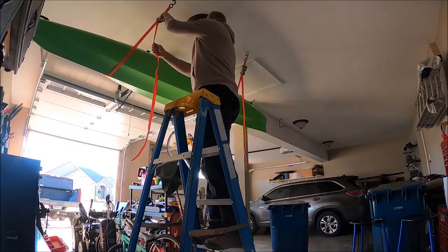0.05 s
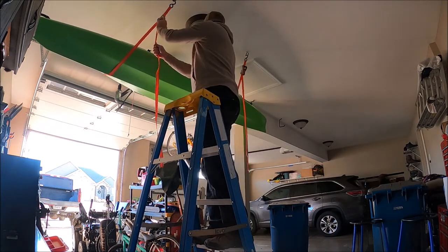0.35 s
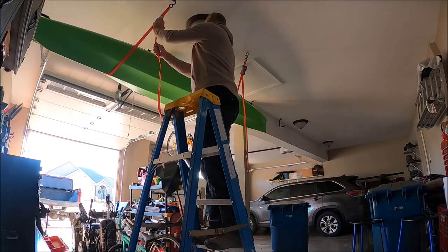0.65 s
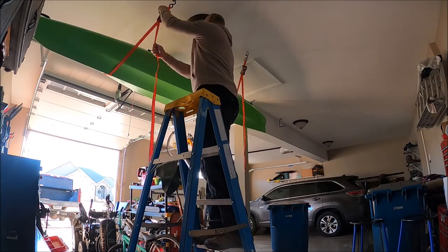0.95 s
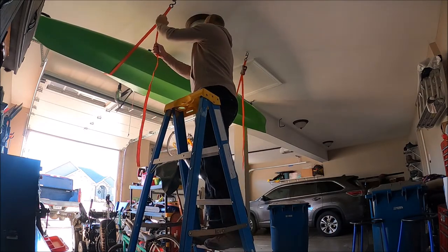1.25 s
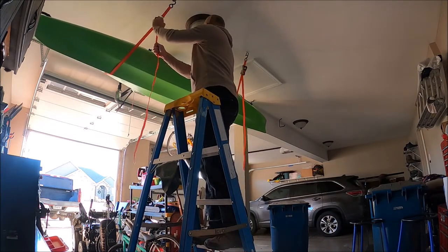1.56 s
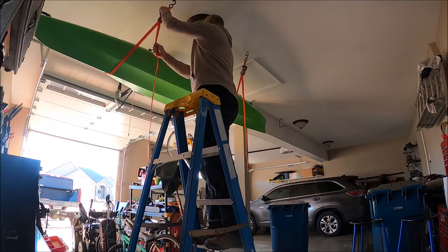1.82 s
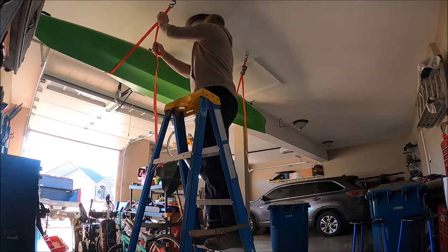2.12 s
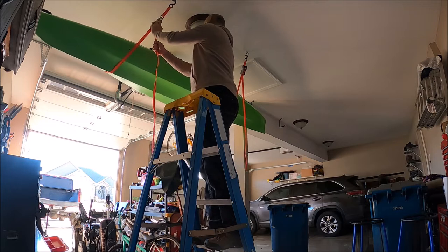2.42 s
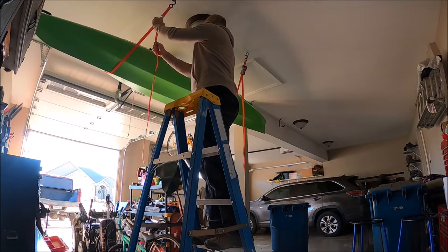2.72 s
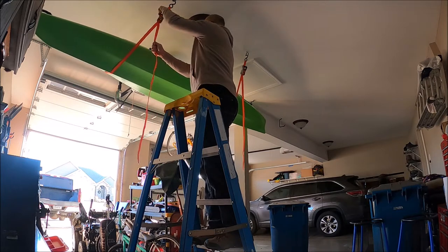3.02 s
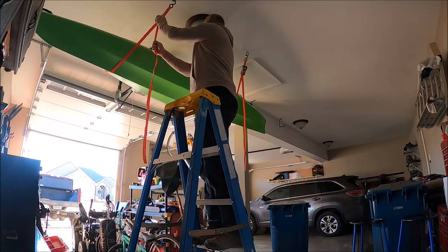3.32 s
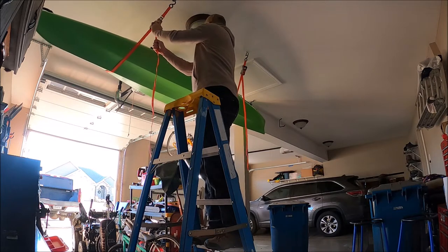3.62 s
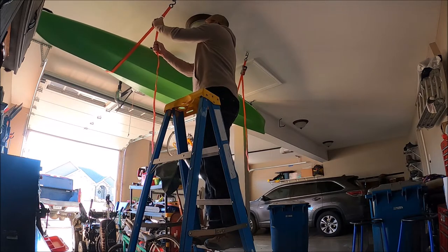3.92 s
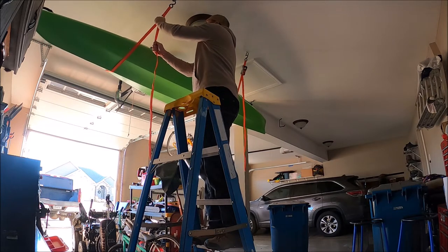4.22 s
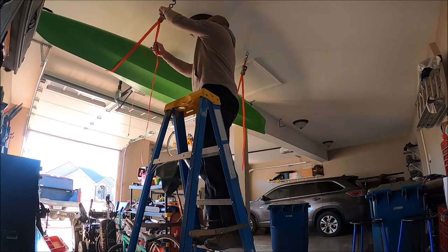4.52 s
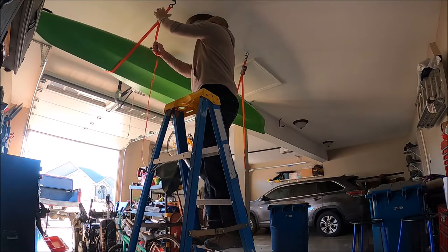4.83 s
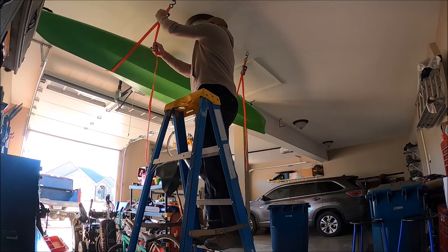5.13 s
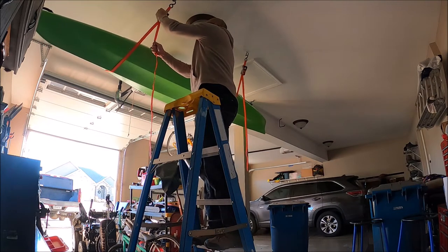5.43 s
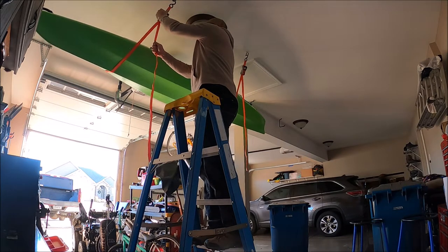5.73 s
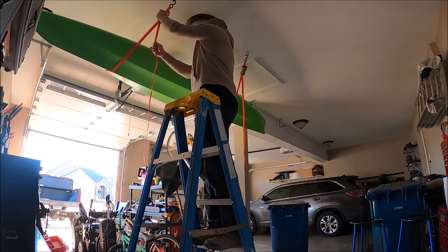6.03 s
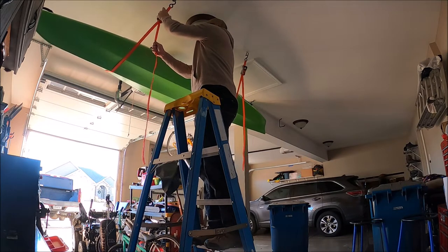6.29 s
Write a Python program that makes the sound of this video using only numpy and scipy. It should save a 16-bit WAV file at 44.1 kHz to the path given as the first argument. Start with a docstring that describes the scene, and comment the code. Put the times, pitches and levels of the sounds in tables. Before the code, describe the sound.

Inside a garage, a metal buckle and hook snap and ring as a strap hoists a kayak. The clicks come in irregular runs, often doubled, and thin out in the second half. Each one jolts the hollow plastic hull into a dull thump, with soft strap rubbing and a low swaying rumble. A stereo microphone pair picks up the short room echo and faint air through the open door.

```python
"""Faint outdoor air through an open garage door and a low rumble come first, then sharp clicks, often paired:
someone on a stepladder hoists a kayak under the ceiling, tugging a strap through its metal buckle.
Buckle and hook crack and ring at each contact; the strap rubs on the hollow hull, which thumps and sways.
Heard from inside on a stereo microphone pair, with the bare garage ringing on and a faint whine far off."""
import sys
import numpy as np
from scipy import signal
from scipy.fft import rfft, irfft, next_fast_len
from scipy.io import wavfile

SR = 44100
rng = np.random.default_rng(int(sys.argv[2]) if len(sys.argv) > 2 else 0)


def log_audio(samples):
    """Write samples as a 16-bit WAV file to the path given in sys.argv[1]."""
    # one column per channel
    frames = np.atleast_2d(samples).T
    # limit to full scale, then quantise
    limited = np.clip(frames, -1, 1)
    pcm = np.round(limited * 32767).astype(np.int16)
    wavfile.write(sys.argv[1], SR, pcm)


N = 284797
TIME = np.arange(N) / SR


def from_db(db):
    """Decibels to gain."""
    return 10 ** (np.asarray(db) / 20)


def at_hz(points, hz):
    """Read a curve on a log-frequency axis."""
    point_hz, values = np.array(points).T
    return np.interp(np.log(hz + 1e-9), np.log(point_hz), values)


def band(x, low, high):
    """Causal band-pass, edges in Hz."""
    return signal.sosfilt(signal.butter(2, [low, high], "band", fs=SR, output="sos"), x)


def colour(x, spectrum):
    """Minimum-phase filter: nothing sounds before its cause."""
    size = 2 * next_fast_len(x.shape[-1])
    gain = from_db(at_hz(spectrum, np.fft.rfftfreq(size, 1 / SR)))
    cepstrum = irfft(np.log(gain))
    cepstrum[1:size // 2] *= 2
    cepstrum[size // 2 + 1:] = 0
    return irfft(rfft(x, size) * np.exp(rfft(cepstrum)))[..., :x.shape[-1]]


def add(track, s, sound):
    """Mix a sound into the track at a time."""
    at = max(round(s * SR), 0)
    track[:, at:at + sound.shape[-1]] += sound[..., :N - at]


def swell(s, rise_db_per_s, fall_db_per_s, hold_s=0):
    """Gain that rises to 1 around a time, holds and dies away."""
    early = np.maximum(s - hold_s / 2 - TIME, 0)
    late = np.maximum(TIME - s - hold_s / 2, 0)
    return from_db(-np.minimum(rise_db_per_s * early + fall_db_per_s * late, 200))


def ring(modes, t, scatter_db, detune):
    """Decaying sines; a blow can scatter the strength and pitch of each mode."""
    hz, db, t60 = np.array(modes, float).T[:, :, None]
    strength, shift, phase = rng.standard_normal((3, len(modes), 1))
    wave = np.sin(2 * np.pi * (hz * (1 + detune * shift) * t + phase))
    return np.sum(from_db(db + scatter_db * strength - 60 * t / t60) * wave, axis=0)


# diffuse sound at the microphone pair: (frequency [Hz], left-right correlation [0-1])
PAIR_CORRELATION = [(120, .94), (300, .87), (600, .78), (1500, .62), (4000, .35), (10000, .17)]

def diffuse(size):
    """White noise from all around, alike at both microphones in the bass and less so in the treble."""
    padded = 2 * next_fast_len(size // 2 + 1)
    mid, side = rfft(rng.standard_normal((2, padded)))
    alike = at_hz(PAIR_CORRELATION, np.fft.rfftfreq(padded, 1 / SR))
    return irfft(np.sqrt((1 + alike) / 2) * mid + np.sqrt((1 - alike) / 2) * side * [[1], [-1]])[:, :size]


def noise(spectrum):
    """Coloured diffuse noise, rms 1."""
    x = colour(diffuse(N), spectrum)
    return x / x.std()


# outdoor air, heard from inside the garage: (frequency [Hz], relative density [dB])
AIR_SPECTRUM = [(30, -1), (80, -10), (180, -18), (300, -23), (700, -33), (1000, -31), (1250, -27.5),
                (1600, -34.5), (4000, -47.5), (8000, -45), (15000, -72.5)]
# swells of a distant whine: (time [s], level [dB], pitch [Hz])
FAR_WHINES = [(0.05, -74, 1280), (0.85, -63.5, 1320), (4.381, -72.5, 1170)]

def outdoors(air_db=-62, whine_width_hz=130):
    """A steady wash of air through the open door, with a far whine that comes and goes."""
    out = from_db(air_db) * noise(AIR_SPECTRUM)
    for s, db, hz in FAR_WHINES:
        whine = band(diffuse(N), hz - whine_width_hz / 2, hz + whine_width_hz / 2)
        out += from_db(db) * swell(s, rise_db_per_s=42, fall_db_per_s=42) * whine / whine.std()
    return out


# decay of the bare garage: (frequency [Hz], t60 [s])
ROOM_DECAY = [(150, 0.27), (800, 0.52), (2000, 0.64), (5000, 0.56), (8500, 0.38), (14000, 0.23)]
# its reverberation at the microphones: (frequency [Hz], relative level [dB])
ROOM_LEVEL = [(200, -1.5), (1000, 8), (3000, 2), (6000, 0.5), (12000, -5)]

def garage(cracks, rings, build_s=0.00088, wash_db=-2.0, echo_db=1.5):
    """Dense reflections off floor, walls and clutter: tones keep their pitch, cracks scatter into a wash."""
    t, response, wash = TIME[:SR], 0, 0
    edges_hz = np.geomspace(100, 17000, 19)
    white = diffuse(N), diffuse(N)   # neighbouring bands get independent noise
    fill = np.exp(-1 / (build_s * SR))
    for k, (low, high) in enumerate(zip(edges_hz, edges_hz[1:])):
        hz = np.sqrt(low * high)
        t60, gain = at_hz(ROOM_DECAY, hz), from_db(at_hz(ROOM_LEVEL, hz))
        field = band(white[k % 2], low, high)
        decay = from_db(-60 * t / t60) * (1 - np.exp(-t / build_s))
        response += gain * field[:, :SR] * decay / np.linalg.norm(decay)
        # the energy of a crack fills the room, then leaks away
        power = band(cracks[0] + 1e-18 * field[0], low, high) ** 2   # tiny floor against underflow
        filled = signal.lfilter([1 - fill], [1, -fill], power)
        retained = from_db(-60 / (t60 * SR)) ** 2
        lingering = signal.lfilter([1 - retained], [1, -retained], filled)
        wash += gain * np.sqrt(lingering) * field / field.std()
    echo = signal.fftconvolve(rings, response, axes=1)[:, :N]
    return from_db(wash_db) * wash + from_db(echo_db) * echo


# the strap rubbing on the shell overhead: (frequency [Hz], relative density [dB])
RUB_SPECTRUM = [(60, -36.5), (160, -12), (188, 3.5), (240, -15.5), (320, -15.5), (410, -19), (600, -34.5),
                (1300, -39), (4000, -31), (15000, -63)]

def strap_rub(sway_power, with_sway_db=-16, with_jolt_db=-4.0, lead_db=-10, knock_share=0.94, lag_s=.025):
    """The strap rubs as the boat sways, as it tightens before each jolt and as it settles after."""
    power = from_db(with_sway_db) ** 2 * sway_power
    for s, boom_db, knock_db in jolts():
        jolt_db = boom_db + knock_share * (knock_db - boom_db)
        strength = from_db(with_jolt_db + jolt_db) * np.where(TIME < s, from_db(lead_db), 1)
        power += (strength * swell(s + lag_s, rise_db_per_s=97.5, fall_db_per_s=104)) ** 2
    return np.sqrt(power) * noise(RUB_SPECTRUM)


# rumble of the boat swaying under the ceiling: (frequency [Hz], relative density [dB])
SWAY_SPECTRUM = [(15, -8), (28, 3.5), (38, -7.5), (49, 1), (62, -8), (85, -16), (115, -17), (160, -28),
                 (300, -36.5), (2000, -93.5)]
# heaves from the stepladder: (peak time [s], hold [s], sway level [dB], thud level [dB])
STRAP_HEAVES = [(0.56, 0.012, -34.5, -43.5), (1.109, 0.16, -37, -43), (1.39, 0.089, -40, -53.5),
                (1.946, 0.11, -37, -40), (2.29, 0.056, -35, -56.5), (2.52, 0.085, -41, -44),
                (3.044, 0.047, -46.5, -48), (3.234, .04, -39, -47.5), (3.585, 0.053, -37.5, -52),
                (4.74, 0.15, -33, -40), (5.33, 0.11, -42, -54.5), (5.584, 0.098, -43, -41)]

def hanging_boat(rest_db=-58, sway_gain_db=0.5, thud_gain_db=-3.0, thud_band_hz=(75, 150)):
    """The boat thuds dully with each heave and rumbles on as it sways against the strap."""
    sway_power, thud_power = from_db(rest_db) ** 2, 0
    for s, hold_s, sway_db, thud_db in STRAP_HEAVES:
        sway_power += (from_db(sway_db) * swell(s, 113, 64, hold_s)) ** 2
        thud_power += (from_db(thud_db) * swell(s, 141.5, 111, hold_s)) ** 2
    thud_noise = band(diffuse(N), *thud_band_hz)
    thuds = from_db(thud_gain_db) * np.sqrt(thud_power) * thud_noise / thud_noise.std()
    rumble = from_db(sway_gain_db) * np.sqrt(sway_power) * noise(SWAY_SPECTRUM)
    return rumble + thuds + strap_rub(sway_power)


# soft bumps of the hull on its own: (time [s], boom level [dB])
HULL_BUMPS = [(0.39, -52), (0.545, -37), (0.919, -45.5), (1.345, -44), (1.764, -41), (2.2, -41),
              (2.781, -48.5), (2.926, -45.5), (4.0, -57), (4.429, -49.5), (4.56, -43), (4.755, -38.5),
              (4.829, -45)]

def jolts(knock_below_boom_db=11):
    """Every snap and bump that shakes the hull: (time [s], boom level [dB], knock level [dB])."""
    snaps = [(s, boom_db, knock_db) for s, *_, boom_db, knock_db in BUCKLE_SNAPS]
    return snaps + [(s, db, db - knock_below_boom_db) for s, db in HULL_BUMPS]


# modes of the hollow hull: (frequency [Hz], relative level [dB], t60 [s])
HULL_MODES = [(177, 1, 0.23), (197, -8, 0.11), (208.4, 2, 0.11), (267, -13.5, 0.17), (380, -1, 0.14),
              (413, 2, 0.17), (497, -4.5, 0.1), (555, -16, .08), (682, -15.5, 0.054)]

def hull(boom_gain_db=-5.0, knock_gain_db=-5.5, rise_s=0.0025, split_hz=300):
    """Each jolt swells into a short thump in the plastic shell: low modes boom, higher ones knock."""
    out, t = np.zeros((2, N)), TIME[:SR // 2]
    for s, boom_db, knock_db in jolts():
        low_db, high_db = boom_db + boom_gain_db, knock_db + knock_gain_db
        modes = [(hz, db + (low_db if hz < split_hz else high_db), t60) for hz, db, t60 in HULL_MODES]
        add(out, s, ring(modes, t, scatter_db=0, detune=.02) * (1 - np.exp(-t / rise_s)))
    return out


def chatter(t, hold_s, attack_s=.0013, decay_s=0.0044, grain_db=1.06, width=0.53):
    """A grainy stereo burst of noise as two surfaces chatter against each other."""
    mid, side, grain = rng.standard_normal((3, len(t)))
    grains = from_db(-grain_db * np.clip(grain, -2, 2))[np.arange(len(t)) // 12]   # 12 samples a grain
    envelope = np.minimum(t / attack_s, 1) * np.exp(-np.maximum(t - hold_s, 0) / decay_s)
    return (mid + width * side * np.array([[1], [-1]])) * grains * envelope


def webbing_slip(s=3.46, db=-56.5, hold_s=0.054, band_hz=(950, 1500)):
    """The webbing slips once through the buckle with a short dull rasp."""
    out = np.zeros((2, N))
    rasp = band(chatter(TIME[:SR // 8], hold_s), *band_hz)
    add(out, s, from_db(db) * rasp / rasp.std())
    return out


# light ticks of the hook as the strap slackens: (time [s], level [dB])
HOOK_TICKS = [(0.295, -67.5), (0.88, -52), (0.979, -51.5), (1.356, -48.5), (1.428, -52.5), (1.4417, -37),
              (1.811, -45), (2.193, -44.5), (2.758, -46.5), (2.887, -61.5), (2.915, -55.5), (3.03, -44.5),
              (3.46, -57), (3.903, -60), (4.575, -61)]
# their tint: (level at 1 kHz [dB], at 2.3 kHz [dB], at 9 kHz [dB])
HOOK_TINT = (3, 2, 1)
# the buckle snaps, seats with a second contact and jolts the hull through the strap:
# (time [s], snap level [dB], snap pitch [Hz], seating delay [s], seating level [dB], seating pitch [Hz],
#  tint at 1 kHz [dB], at 2.3 kHz [dB], at 9 kHz [dB], hull boom [dB], hull knock [dB])
BUCKLE_SNAPS = [(0.4634, -28.5, 2530, .004, -31, 5470, -1.5, 0.5, 4.5, -31.5, -34.5),
                (0.607, -30.5, 2330, 0.0095, -32, 3500, 2.5, 1, 1.5, -41.5, -45),
                (1.013, -23.5, 5000, 0.0032, -29, 4400, 0.5, -4, 1, -37, -42.5),
                (1.1038, -22.5, 4170, 0.0039, -27, 5050, 4, -2.5, 0.5, -36.5, -42),
                (1.4452, -28, 5440, 0.01, -35.5, 8200, 7, 1.5, 5, -38.5, -36.5),
                (1.554, -31, 1856, 0.0045, -27, 1820, 2.5, 0, 2.5, -33.5, -44.5),
                (1.8596, -22, 2120, 0.0033, -31.5, 5650, -1.5, 6, -2, -46.5, -46),
                (1.95, -22.5, 2770, .0095, -22, 2700, 0.5, -0.5, -4, -47, -46.5),
                (2.251, -28.5, 3630, .004, -30.5, 3800, 5.5, -5, -.5, -26.5, -40.5),
                (2.3784, -26, 2130, .013, -27.5, 920, 6, 1.5, 2.5, -28, -36),
                (2.4622, -25.5, 4040, 0.0051, -29, 1880, 4.5, 2.5, 3.5, -36, -36.5),
                (3.0406, -24.5, 2800, 0.01, -25, 3490, -5.5, 4, -4, -32, -45),
                (3.1869, -22, 3400, 0.012, -25, 2700, -0.5, 0.5, -3, -35.5, -43),
                (3.499, -31, 4870, 0.0044, -28, 5450, 5, 1.5, 3.5, -28.5, -40.5),
                (3.596, -27, 4409, .006, -29.5, 8300, 7, 5, 4.5, -24, -38.5),
                (4.6375, -26.5, 3040, 0.0051, -21, 3000, -4, 0, -1, -35, -73.5),
                (5.271, -24, 5180, .004, -25.5, 3420, 3.5, -5, -2, -38, -44.5),
                (5.509, -27, 5280, 0.0038, -29, 5550, 10.5, 2.5, 4.5, -31.5, -36.5)]

def contacts(snap_hold_s=0.0025, seat_hold_s=0.0017, tick_hold_s=0.0029, tick_hz=5230):
    """Metal touches metal: (time [s], level [dB], tint [dB], favoured pitch [Hz], chatter hold [s])."""
    for s, db, snap_hz, delay_s, seat_db, seat_hz, *tint, _, _ in BUCKLE_SNAPS:
        yield s - .0025, db - 24.5, tint, snap_hz, snap_hold_s   # the parts graze just before they snap
        yield s, db, tint, snap_hz, snap_hold_s
        yield s + delay_s, seat_db, tint, seat_hz, seat_hold_s
    for s, db in HOOK_TICKS:
        yield s, db, HOOK_TINT, tick_hz, tick_hold_s


# the crack of one contact, thickened by the ceiling just above: (frequency [Hz], relative density [dB])
CRACK_SPECTRUM = [(500, -25.5), (800, -12), (1100, -13.5), (1600, -7), (2200, -2), (3400, 3), (5200, 3.5),
                  (7000, 1), (8400, 2), (9800, -7), (11500, -8), (14000, -22), (16000, -31.5)]
# modes of buckle and hook: (frequency [Hz], relative level [dB], t60 [s])
METAL_MODES = [(930, -10, 0.053), (1292, -9.5, 0.13), (1782, -6.5, 0.11), (1920, -3.5, 0.055),
               (2130, -5, 0.054), (2340, -8.5, .08), (2760, -5, 0.1), (3080, -6.5, 0.13),
               (3360, -8.5, 0.54), (3510, -1.5, 0.15), (3786, -2.5, 0.15), (4200, -3.5, 0.12),
               (4409, -17.5, 0.19), (4530, -5.5, .12), (5120, -4.5, 0.11), (5420, -7.5, .33),
               (5750, 4.5, .08), (6200, -1, .08), (7820, 4, 0.093), (8210, -0.5, .12), (8400, 2, .09),
               (10140, -9, 0.11), (10900, -16.5, .06)]

def buckle_and_hook(crack_gain_db=4.5, ring_gain_db=-19.5, favour_db=9.0, favour_octaves=0.075):
    """Each contact cracks with a colour of its own and sets the metal ringing, damped by the webbing."""
    cracks, rings = np.zeros((2, 2, N))
    t = TIME[:SR // 2]
    for s, db, (low_db, mid_db, high_db), favoured_hz, hold_s in contacts():
        tint = [(1000, low_db), (2300, mid_db), (4700, 0), (9000, high_db)]
        crack = colour(chatter(t[:SR // 16], hold_s), CRACK_SPECTRUM)
        # where the metal is struck decides which part of the crack and which modes speak loudest
        crack += band(crack, favoured_hz / 1.08, favoured_hz * 1.08)
        modes = [(hz, level + favour_db * np.exp(-(np.log2(hz / favoured_hz) / favour_octaves) ** 2), t60)
                 for hz, level, t60 in METAL_MODES]
        ringing = ring(modes, t, scatter_db=2.0, detune=0.008)
        add(cracks, s, from_db(db + crack_gain_db) * colour(crack, tint))
        add(rings, s, from_db(db + ring_gain_db) * colour(ringing, tint))
    return cracks, rings


def scene():
    """Buckle, hook and hull sound in the garage, over the rumble of the boat and the air outside."""
    cracks, rings = buckle_and_hook()
    cracks += webbing_slip()
    rings += hull()
    return cracks + rings + garage(cracks, rings) + hanging_boat() + outdoors()


# colour of the two microphone ports: (frequency [Hz], left minus right [dB])
PORT_BALANCE = [(50, 3), (250, 0.5), (600, 0), (2400, 3.5), (5000, 2), (8000, 3), (12000, -3.5)]

def record(dry, left_lag_s=.00001, cutoff_hz=16000):
    """The microphone ports differ in colour, sound reaches the left a little later, and the top is cut."""
    left = colour(dry[0], [(hz, db / 2) for hz, db in PORT_BALANCE])
    right = colour(dry[1], [(hz, -db / 2) for hz, db in PORT_BALANCE])
    size = 2 * next_fast_len(N)
    delay = np.exp(-2j * np.pi * np.fft.rfftfreq(size, 1 / SR) * left_lag_s)
    left = irfft(rfft(left, size) * delay)[:N]
    low_pass = signal.ellip(10, .2, 80, cutoff_hz, fs=SR, output="sos")
    return signal.sosfilt(low_pass, [left, right])


dry = scene()
out = record(dry)
log_audio(out)
```